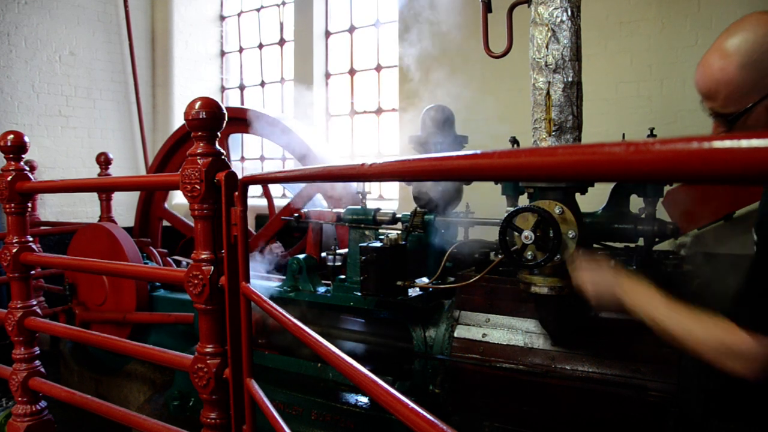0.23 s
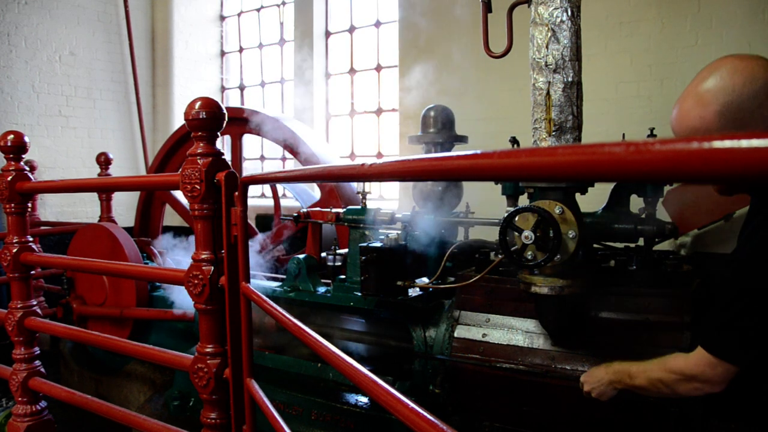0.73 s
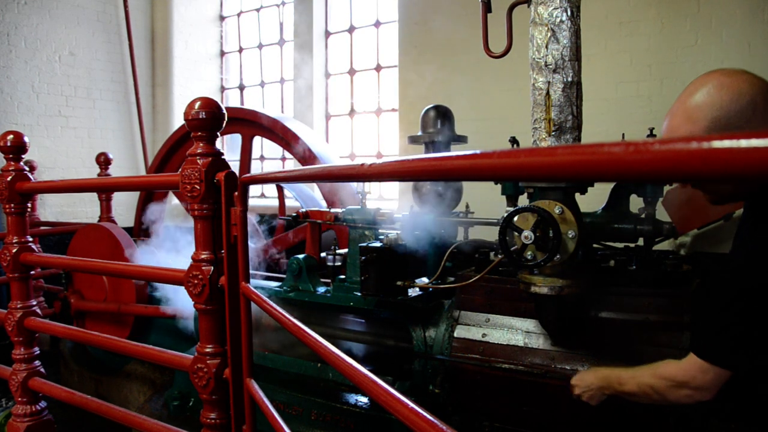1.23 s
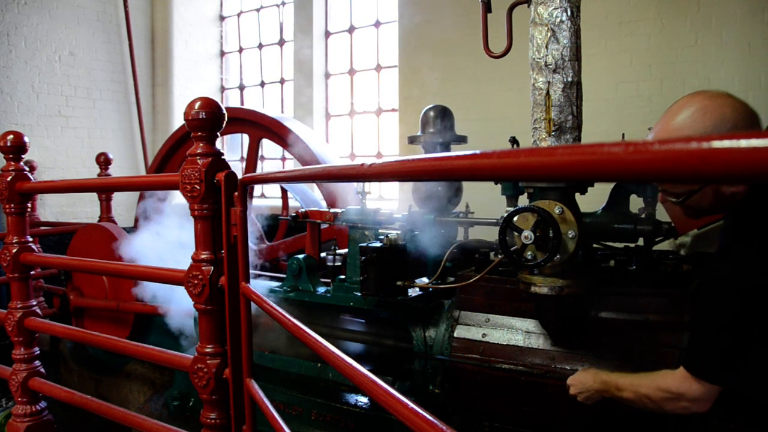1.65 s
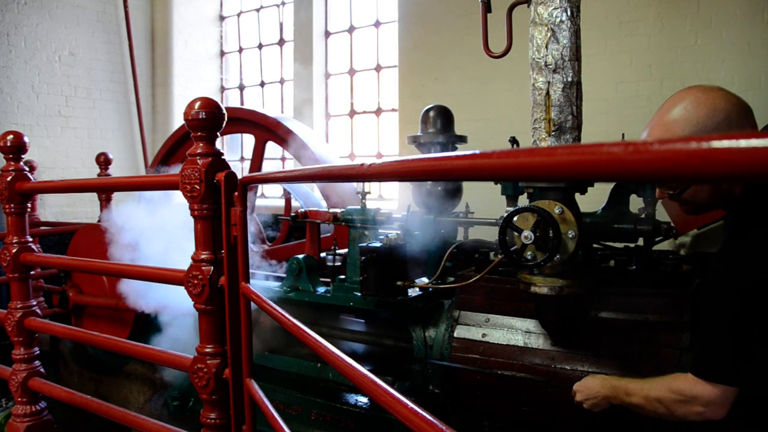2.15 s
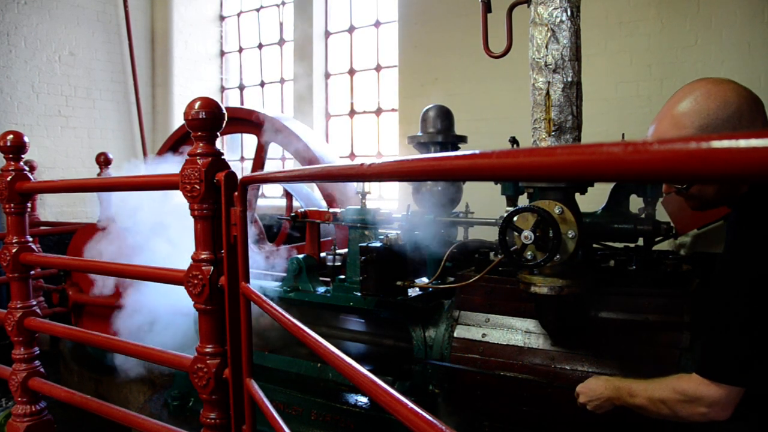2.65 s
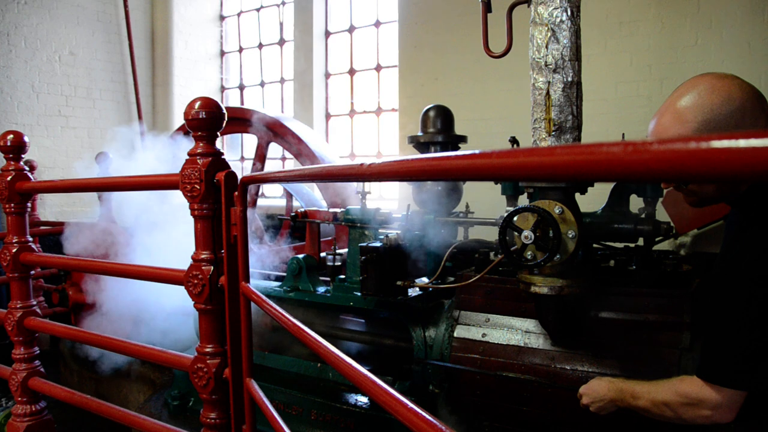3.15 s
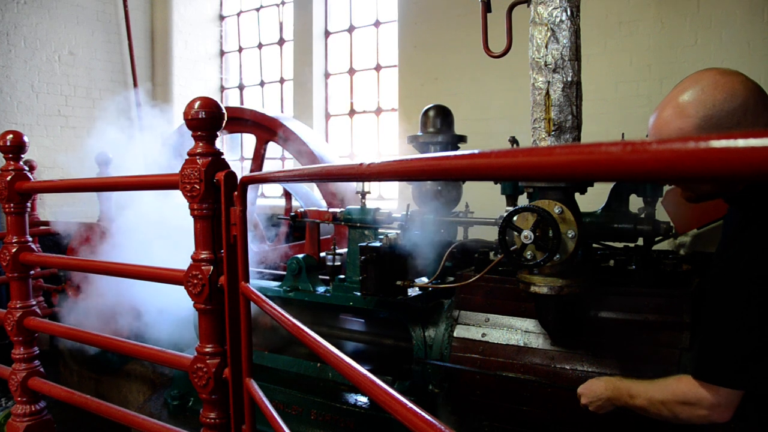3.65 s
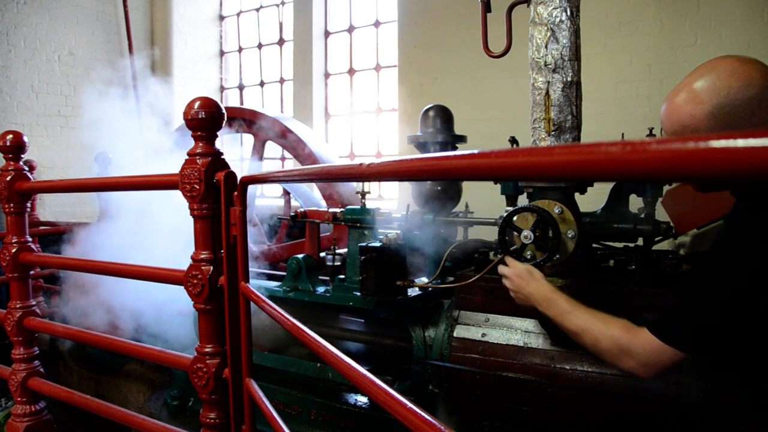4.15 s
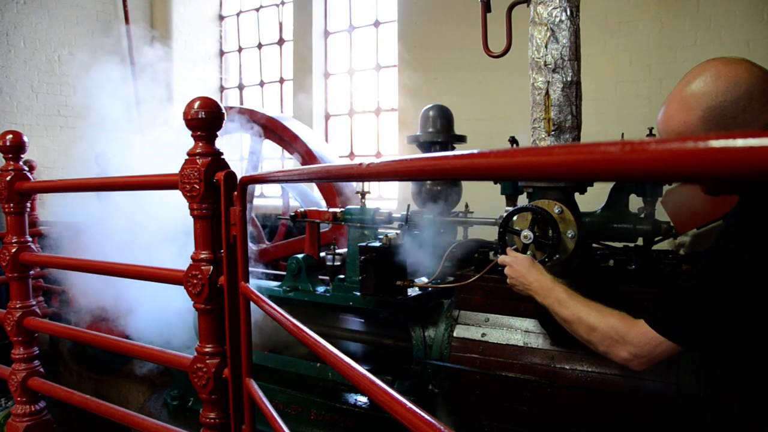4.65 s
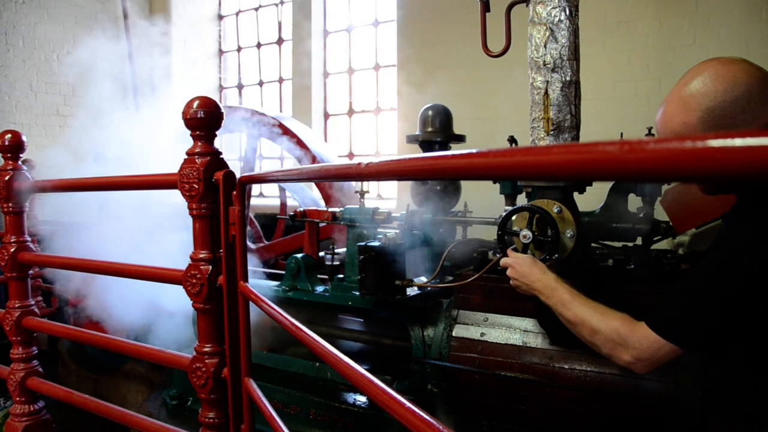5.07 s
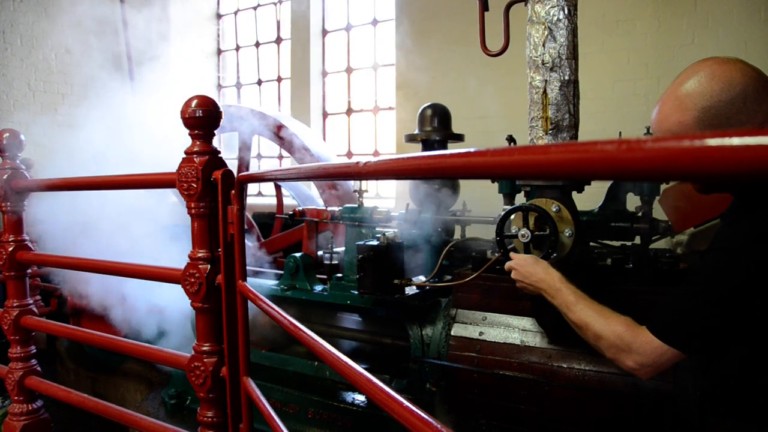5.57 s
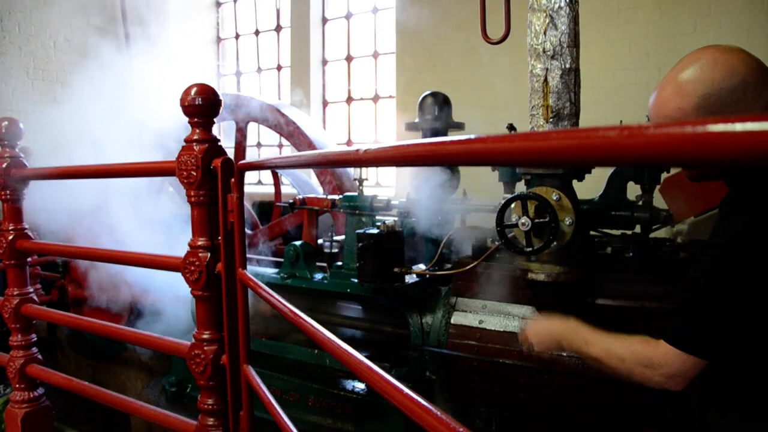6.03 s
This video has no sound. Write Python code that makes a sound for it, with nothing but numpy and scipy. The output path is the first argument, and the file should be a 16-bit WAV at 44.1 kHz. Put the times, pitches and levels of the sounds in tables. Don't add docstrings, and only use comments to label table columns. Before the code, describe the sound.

A thin steady steam leak hisses in a brick hall, then a drain cock bursts open with a loud wet roar that dries into brighter hiss.

```python
import sys
import numpy as np
from scipy import signal
from scipy.io import wavfile
from scipy.ndimage import uniform_filter1d

SR = 44100
rng = np.random.default_rng(int(sys.argv[2]) if len(sys.argv) > 2 else 0)


def materialize(psi):
    bounded = np.clip(np.atleast_2d(psi).T, -1, 1)
    quanta = np.round(bounded * 32767).astype(np.int16)
    wavfile.write(sys.argv[1], SR, quanta)


def volts(x):
    e = np.asarray(x, float) / 20
    return 10 ** e


N = 277830
T = np.arange(N) / SR

# hz, level_db (per Hz)
HALL_COLOUR = [(15, -53), (25, -19), (65, -16.5), (91, -9), (303, 3.5), (418, -13), (480, 18), (515, -18),
               (700, -3), (910, -40), (1540, -120)]
# multiple of the motor's speed, level_db (rms)
MOTOR_TONES = [
    (2, -60),
    (10, -48.5),
]
# hz, level_db (per Hz)
LEAK_COLOUR = [(180, -46), (300, -20), (476, -16.5), (631, -15.5), (1460, -11), (1970, -7), (3180, -10),
               (4490, -4.5), (5390, -12.5), (7370, -3), (9600, -16.5), (10400, -17), (15500, -35)]
# hz, width_hz
LEAK_RESONANCES = [(2000, 270), (4090, 250), (4400, 95), (5620, 500), (6550, 200), (7230, 220), (7370, 60),
                   (7520, 180), (8200, 150), (9420, 120), (10200, 400), (11600, 800), (12650, 500)]
LEAK_RESONANCES_DB = [0.5, 0, -0.5, -4.5, 1.5, 7.5, -5.5, 7.5, 1, 5.5, 3.5, -3.5, 3.5]
# start_s, length_s, first_hz, glide_hz_per_s, level_db
WHISTLES = [(-.12, .3, 3390, 30, -32), (.05, .29, 3950, 690, -34.5), (.26, .24, 4350, 290, -34),
            (-.15, .5, 4900, 200, -36.5), (-.15, .33, 6550, -150, -34), (1.0, .6, 2030, -70, -38.5),
            (1.0, .6, 4150, -170, -35), (2.2, 1.7, 720, 35, -38), (4.2, 1.05, 3530, 70, -29.5),
            (5.6, .8, 1820, 10, -33), (4.3, 1.1, 3810, 10, -32), (4.35, .45, 3230, 0, -32),
            (2.25, 1.2, 1690, 0, -33)]
# hz, level_db (per Hz)
DRAIN_COLOUR = [(180, -48), (300, -21), (468, -25.5), (1870, -2.5), (3690, -2), (4420, -2), (6790, 1),
                (9450, -22), (15500, -53)]
# hz, width_hz
DRAIN_RESONANCES = [(720, 120), (1700, 80), (2450, 250), (2890, 110), (3240, 120), (3560, 130), (4600, 300),
                    (4950, 200), (5870, 110), (6170, 120), (6640, 150), (7300, 500), (8550, 90),
                    (9630, 150), (10050, 250), (10800, 200)]
DRAIN_RESONANCES_DB = [5.5, 2.5, 1.5, 3.5, 3.5, 4, -2.5, 0, 8, 2.5, 2, 3.5, -3, 0.5, 8, 8]
# time_s, wetness (0 to 1)
WETNESS = [
    (2.2, 1),
    (2.45, 0.89),
    (3.2, 0.93),
    (3.55, 0.74),
    (3.85, 0.37),
    (4.4, 0.48),
    (5.0, .2),
    (5.7, .01),
    (6.3, 0.08),
]
# dry_level_db, wet_change_db (when fully wet)
JET_LAYERS = [
    (-35.5, 7),
    (-24.5, 6),
    (-15, -0.6),
    (-18.5, -5.5),
]
# hz, width_hz
HOUSING_NOTCHES = [(5710, 170), (6900, 110), (15000, 260)]
HOUSING_NOTCHES_DB = [-12.5, -14, -16]

HALL_RUMBLE_DB = -43.5
MOTOR_HZ, MAINS_HZ, MAINS_DB = 48.59, 100.18, -58
IN_STEP_S = 0.066
LEAK_DB, LEAK_CLIMB_DB_PER_S = -20.5, 0.63
LEAK_TILT_DB, TILT_LOSS_DB_PER_S = 0.79, 0.2547
WHISTLE_WIDTH_HZ, WIDER_HZ_PER_S = 20, 28
COCK_OPENS_S, COCK_RISE_S = 2.19, 0.075
ROAR_RISE_S = 0.12
SPIT_DB, SPIT_S = 2.1, 0.068
SLUG_S, SLUG_LENGTH_S, SLUG_DB = 3.23, 0.25, 3.8
HALL_T60_S, WET_DB = 0.99, -7.5
DUCK_DB, DUCK_S = -4, 2


def rms_one(x):
    return x / np.sqrt(np.mean(x ** 2) + 1e-20)


def drift(rate_hz):
    r = np.exp(-2 * np.pi * rate_hz * 40 / SR)
    noise = rng.standard_normal(N // 40 + 2002)
    slow = signal.lfilter([1], [1, -2 * r, r * r], noise)[2000:]
    return np.interp(np.arange(N) / 40, np.arange(len(slow)), rms_one(slow))


def flicker(rate_hz):
    wander = drift(rate_hz)
    return wander - uniform_filter1d(wander, size=SR // 12)


def resonances(x, modes, gains_db):
    for (hz, width_hz), gain_db in zip(modes, gains_db):
        a = volts(gain_db / 2)
        half = np.pi * width_hz / SR
        middle = -2 * np.cos(2 * np.pi * hz / SR)
        x = signal.lfilter([1 + half * a, middle, 1 - half * a], [1 + half / a, middle, 1 - half / a], x)
    return x


def noise_bands(colour, shared_db, own_db):
    hz_points, db_points = np.transpose(colour)
    octaves = np.log2(hz_points[-1] / hz_points[0])
    edges = hz_points[0] * 2 ** np.arange(0, octaves + 0.2, 1 / 3)
    centres = np.sqrt(edges[1:] * edges[:-1])
    white = rng.standard_normal((2, N + SR // 2))
    together_db = shared_db * (flicker(36) + flicker(170))
    bands = []
    for k, hz in enumerate(centres):
        band_filter = signal.butter(2, edges[k:k + 2], "band", fs=SR, output="sos")
        band = signal.sosfilt(band_filter, white[k % 2])[-N:]
        colour_db = np.interp(np.log(hz), np.log(hz_points), db_points)
        bands.append(band * volts(colour_db + together_db + own_db * flicker(20)))
    return centres, np.array(bands)


def ducking_db():
    return DUCK_DB * (1 - np.exp(-np.maximum(T - COCK_OPENS_S, 0) / DUCK_S))


def hum():
    angle = 2 * np.pi * (T - IN_STEP_S)
    tones = volts(MAINS_DB + 1.2 * drift(1.2)) * np.cos(MAINS_HZ * angle)
    for multiple, level_db in MOTOR_TONES:
        tones += volts(level_db + 0.6 * drift(1.5)) * np.cos(multiple * MOTOR_HZ * angle)
    _, bands = noise_bands(HALL_COLOUR, shared_db=0.1, own_db=2.5)
    rumble = rms_one(bands.sum(axis=0))
    return volts(ducking_db()) * (np.sqrt(2) * tones + volts(HALL_RUMBLE_DB) * rumble)


def gland_leak():
    building_s = np.minimum(T, COCK_OPENS_S)
    level_db = LEAK_DB + LEAK_CLIMB_DB_PER_S * building_s + ducking_db()
    tilt_db = LEAK_TILT_DB - TILT_LOSS_DB_PER_S * building_s
    centres, bands = noise_bands(LEAK_COLOUR, shared_db=-0.92, own_db=-0.24)
    hiss = sum(band * volts(tilt_db * np.log2(hz / 4000)) for hz, band in zip(centres, bands))
    return volts(level_db) * rms_one(resonances(hiss, LEAK_RESONANCES, LEAK_RESONANCES_DB))


def valve_whistles():
    out = np.zeros(N)
    for start_s, length_s, first_hz, glide_hz_per_s, level_db in WHISTLES:
        along = np.clip((T - start_s) / length_s, 0, 1)
        pitch_hz = first_hz + glide_hz_per_s * length_s * along
        angle = 2 * np.pi * np.cumsum(pitch_hz) / SR
        swell = np.sqrt(np.abs(np.sin(np.pi * along))) * (along > 0) * (along < 1)
        width_hz = WHISTLE_WIDTH_HZ + WIDER_HZ_PER_S * length_s
        whistle = drift(width_hz) * np.cos(angle) + drift(width_hz) * np.sin(angle)
        out += volts(level_db) * swell * whistle
    return out


def drain_cock():
    centres, bands = noise_bands(DRAIN_COLOUR, shared_db=0.48, own_db=0.5)
    layer_of_band = np.digitize(centres, [1300, 2900, 8000])
    time_s, wetness = np.transpose(WETNESS)
    wet = np.interp(T, time_s, wetness)
    layers = []
    for k, (dry_level_db, wet_change_db) in enumerate(JET_LAYERS):
        noise = rms_one(bands[layer_of_band == k].sum(axis=0))
        layers.append(volts(dry_level_db + wet_change_db * wet) * noise)
    rumble, roar, hiss, top = layers

    since_s = T - COCK_OPENS_S
    slug = volts(SLUG_DB * np.exp(-((T - SLUG_S) / SLUG_LENGTH_S) ** 2))
    spit = volts(SPIT_DB * np.exp(-np.maximum(since_s, 0) / SPIT_S))
    steam_rise = np.clip(since_s / COCK_RISE_S, 0, 1)
    water_rise = np.clip(since_s / ROAR_RISE_S, 0, 1)
    jet = water_rise * (slug * rumble + roar) + steam_rise * spit * (hiss + top)
    return volts(-1.5) * resonances(jet, DRAIN_RESONANCES, DRAIN_RESONANCES_DB)


def hall(x):
    age_s = np.arange(SR) / SR
    fade_s = np.array([[HALL_T60_S], [0.52 * HALL_T60_S]])
    low, high = rng.standard_normal((2, SR)) * volts(-60 * age_s / fade_s) * (age_s > 0.006)
    tail = high + signal.lfilter([0.3], [1, -0.7], low)
    run_in = np.concatenate([x[SR:0:-1], x])
    wet = rms_one(signal.fftconvolve(run_in, tail)[SR:SR + N]) * np.std(x)
    return (x + volts(WET_DB) * wet) / np.sqrt(1 + volts(2 * WET_DB))


def scene():
    mono = hall(gland_leak() + drain_cock() + valve_whistles()) + hum()
    return np.array([mono, mono])


def top_cut(x):
    return signal.sosfilt(signal.butter(12, 15680, fs=SR, output="sos"), x)


def record(dry):
    mono = resonances(dry[0], HOUSING_NOTCHES, HOUSING_NOTCHES_DB)
    mono = 1.4 * np.tanh(mono / 1.31)
    return top_cut(np.array([mono, mono]))


dry = scene()
out = record(dry)
materialize(out)
```